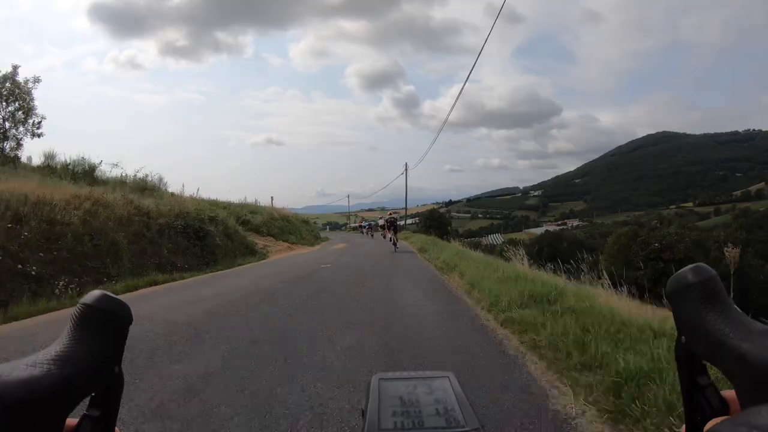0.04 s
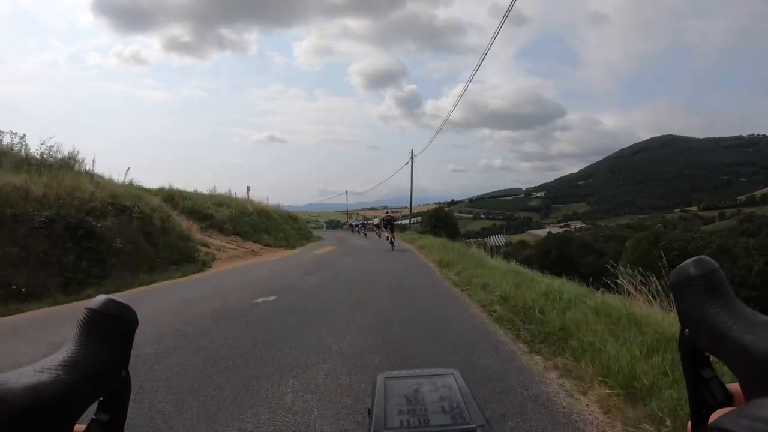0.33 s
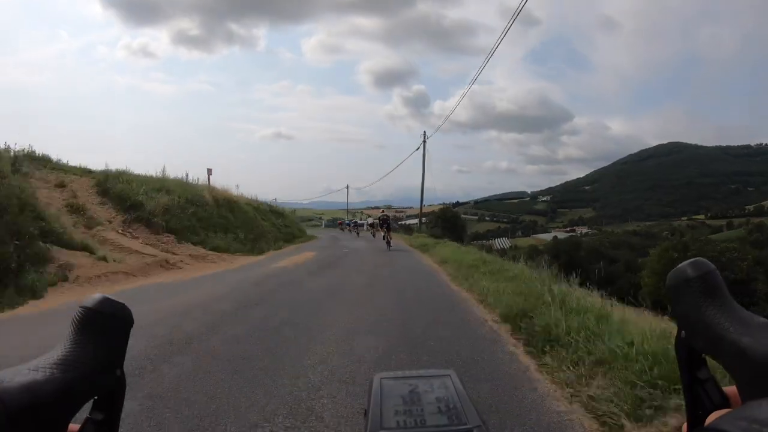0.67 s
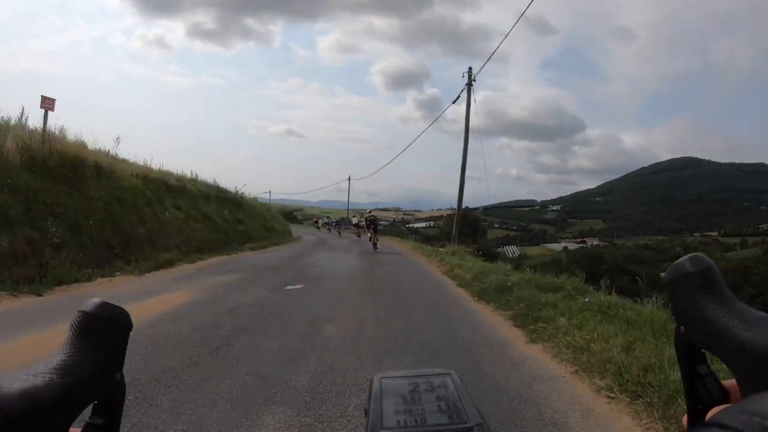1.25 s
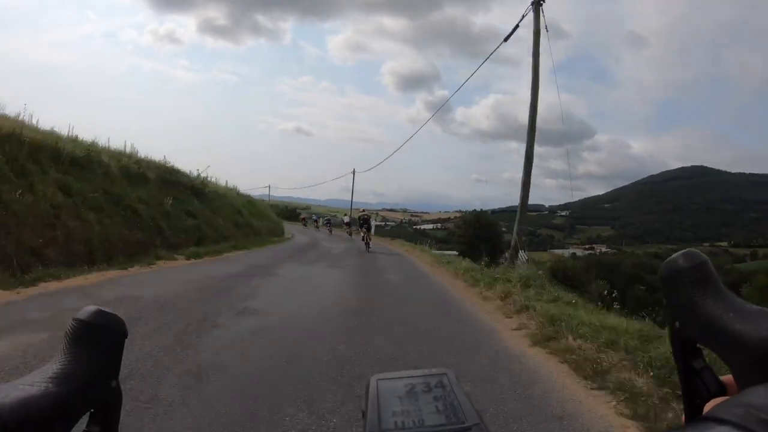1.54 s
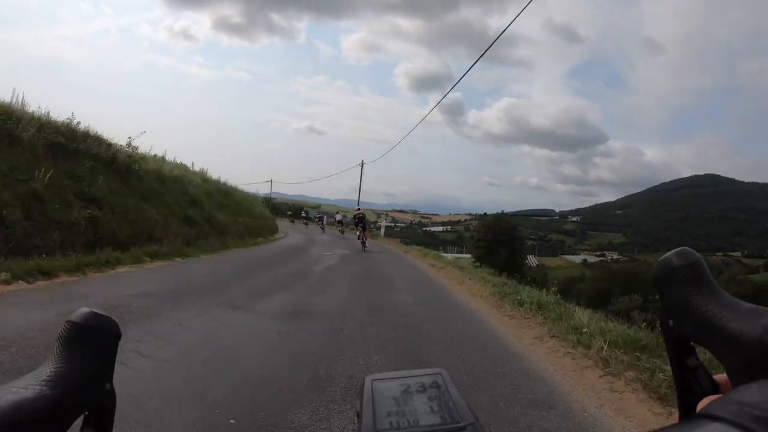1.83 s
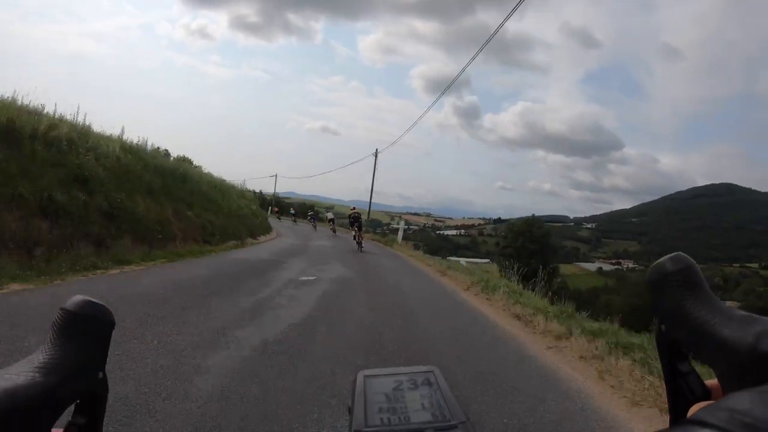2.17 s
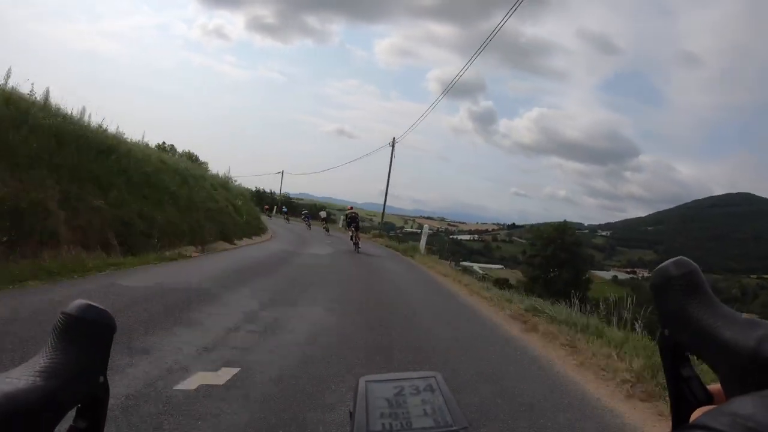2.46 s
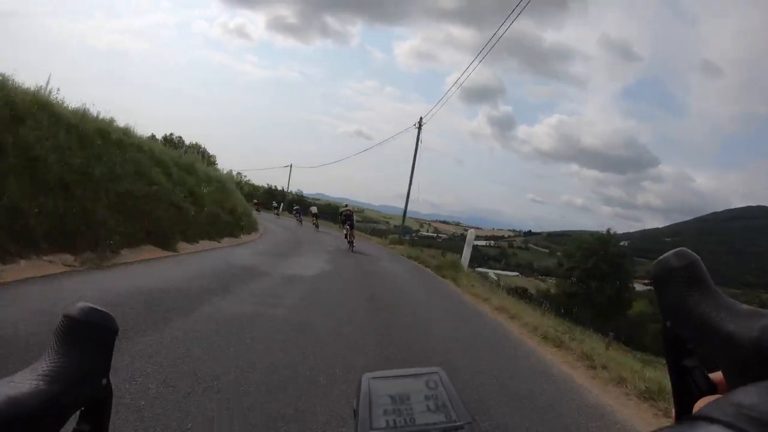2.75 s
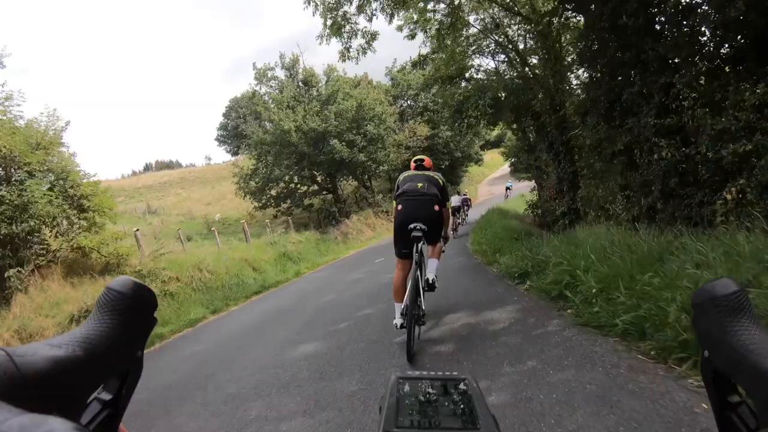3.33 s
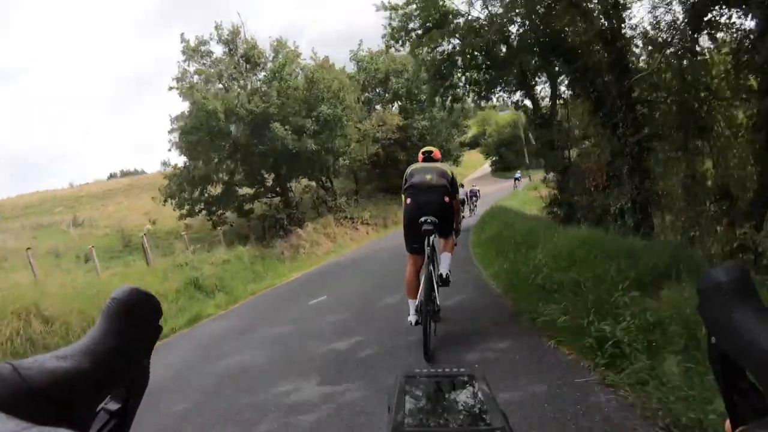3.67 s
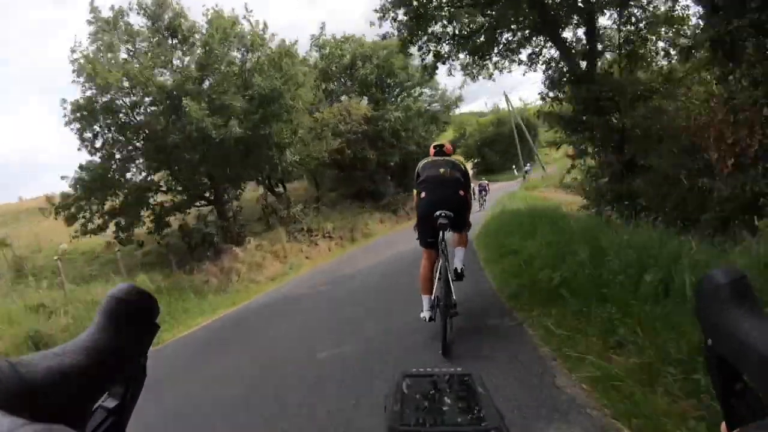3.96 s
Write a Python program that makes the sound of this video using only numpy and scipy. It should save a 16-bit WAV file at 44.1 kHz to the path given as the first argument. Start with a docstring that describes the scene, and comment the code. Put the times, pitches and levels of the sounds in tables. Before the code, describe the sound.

Wind rumbles and roars over the microphone of a speeding bicycle as something rattles.

```python
"""Wind on the microphone of a fast road bicycle fades in: heavy rumble, buffeting roar and tearing rasp
as eddies break on the port, with ragged puffs and lulls. A loose part rattles and grit ticks. Early on,
a ringing scrape, perhaps a brake, swells and dies. A thin hiss lies behind, duller after a late click.
A limiter holds the level."""
import sys
import numpy as np
from scipy import signal
from scipy.fft import rfft, irfft, next_fast_len
from scipy.io import wavfile
from scipy.ndimage import uniform_filter1d, minimum_filter1d, map_coordinates

SR = 44100
rng = np.random.default_rng(int(sys.argv[2]) if len(sys.argv) > 2 else 0)


def master_out(mix):
    """Clip the mix to full scale and print it as 16-bit PCM to the path in sys.argv[1]."""
    frames = np.transpose(np.atleast_2d(mix))
    ceiling = np.clip(frames, -1, 1)
    pcm = np.round(ceiling * 32767).astype(np.int16)
    wavfile.write(sys.argv[1], SR, pcm)


N = 176400

# Level curves: time_s, level_db
ROAR_LEVELS = [(.2, -19.5), (.34, -16), (.42, -21.5), (.65, -22.5), (.8, -20.5), (1.1, -20.5), (1.27, -24),
               (1.36, -21), (1.58, -17.5), (1.85, -21), (2.12, -21), (2.38, -21.5), (2.72, -22.5),
               (3.1, -26), (3.28, -21.5), (3.5, -24.5)]
RASP_LEVELS = [(.2, -25.5), (.35, -27.5), (.5, -29), (.73, -25), (.95, -28.5), (1.26, -31.5), (1.34, -27.5),
               (1.52, -24.5), (1.75, -28.5), (2.12, -28.5), (2.42, -31.5), (2.56, -29.5), (3.02, -34),
               (3.25, -29), (3.45, -35), (3.8, -31), (4, -37)]
SCRAPE_LEVELS = [(.15, -51), (.3, -30), (.385, -31.5), (.43, -19), (.46, -27), (.49, -25.5), (.52, -29),
                 (.56, -23.5), (.62, -41), (.67, -35), (.95, -78)]
# Noise spectra: freq_hz, gain_db
RUMBLE_SPECTRUM = [(8, -19), (22, -2), (36, -3), (62, 0), (78, -2), (95, -5.5), (120, -2), (155, -13),
                   (300, -25), (900, -85)]
ROAR_SPECTRUM = [(70, -42), (140, -3.5), (200, 0.5), (270, -3), (370, -5), (560, -8), (800, -13),
                 (1200, -21), (2200, -30), (6000, -90)]
RASP_SPECTRUM = [(200, -19), (600, 7.5), (1300, 1.5), (2050, 0), (2550, -6.5), (3000, -6), (3400, -7.5),
                 (4100, -14), (5050, -20.5), (6000, -24.5), (7200, -28.5), (10000, -38), (12500, -51.5),
                 (15500, -66)]
HISS_SPECTRUM = [(1000, 8), (4500, 10.5), (6500, 1), (7500, -0.5), (9900, -1), (11200, -9.5), (13000, -32),
                 (15000, -31)]
LATE_HISS_SPECTRUM = [(1000, -13), (4500, 10.5), (6500, 2), (8000, 3), (9000, -12), (11400, -4),
                      (12300, -15), (15000, -24)]
RATTLE_SPECTRUM = [(300, -29), (1200, -7.5), (1950, 10), (2600, -11), (3400, 0), (4200, -12.5), (5100, -10),
                   (6100, -38), (10000, -34.5), (13000, -61), (16000, -66)]
CATCH_SPECTRUM = [(1000, -26), (2500, 10), (4600, 3), (5500, -11), (6600, -18), (9800, -17), (11500, -32),
                  (15000, -42)]
PUFF_SPECTRUM = [(150, 2), (400, 7), (750, 5), (1300, 0.5), (2000, -3.5), (2700, -9), (3400, -12.5),
                 (6200, -29.5), (15000, -65)]
GRIT_SPECTRUM = [(2000, -15), (4500, 13), (6500, 5), (10000, -3), (15000, -25)]
# Knocks of a loose part on the handlebar: start_s, level_db
RATTLE_KNOCKS = [(0.1463, -9.5), (0.1681, -9), (0.224, -9), (0.2462, -7.5), (0.271, -12), (0.3245, -4),
                 (0.3466, -11), (0.6346, -13), (1.015, -9), (1.33, -13), (1.4106, -14), (1.476, -12),
                 (1.5284, -11.5), (1.5781, -16), (1.868, -14), (1.998, -20), (2.276, -24), (2.411, -18),
                 (2.546, -17.5), (2.569, -19.5), (2.872, -15), (2.92, -16.5), (3.028, -16), (3.108, -14),
                 (3.1284, -13), (3.151, -15), (3.2061, -21), (3.352, -15), (3.5392, -13), (3.7844, -15),
                 (3.818, -15), (3.8421, -17), (3.888, -14.5), (3.942, -15.5)]
# Scrape resonances: freq_hz, width_hz, gain_db
SCRAPE_RESONANCES = [(1400, 70, -1), (1670, 130, -2.5), (2000, 210, -3), (2760, 730, -12),
                     (3380, 310, -6.5), (4620, 600, -16.5), (5260, 580, -16.5)]
# Gritty catches in the scrape: centre_s, half_length_s, level_db
SCRAPE_CATCHES = [(.428, 0.014, -23.5), (.489, 0.01, -26)]
# Spurts of the scrape's whine: centre_s, half_length_s, level_db, pitch_hz
WHINE_SPURTS = [(.4, .018, -33.5, 3470), (.553, .016, -33, 3380), (.582, .016, -35, 3590),
                (0.667, 0.033, -38.5, 3400)]
# Deep buffets and ragged puffs of air: centre_s, half_length_s, level_db
AIR_BUFFETS = [(.215, 0.015, -15.5), (1.195, 0.019, -18.5), (3.292, 0.012, -21)]
AIR_PUFFS = [(.727, 0.007, -20), (1.94, 0.0071, -18), (2.005, 0.0044, -22), (2.08, 0.017, -22.5),
             (2.71, 0.025, -23), (3.235, 0.0043, -20.5), (3.37, 0.0064, -19.5), (3.465, 0.0065, -19),
             (3.537, 0.0066, -17.5), (3.605, 0.0086, -24), (3.631, 0.015, -19), (3.722, 0.0052, -18.5),
             (3.98, 0.014, -20)]
# Clear ticks of grit: start_s, level_db
GRIT_TICKS = [(0.8111, -36), (1.3688, -34), (1.7739, -38), (2.835, -31.5), (3.1328, -36)]
# Lulls between gusts: centre_s, half_length_s, depth_db
WIND_LULLS = [(1.254, 0.01, 7), (2.377, 0.015, 6), (3.085, 0.036, 2), (3.806, 0.0074, 6)]

CLICK_S = 3.3272


def amp(db):
    """Decibels to gain."""
    return 10 ** (np.asarray(db) / 20)


def unit(x):
    """Scale to rms 1."""
    return x / np.sqrt(np.mean(x ** 2) + 1e-20)


def clock():
    """Seconds at each sample."""
    return np.arange(N) / SR


def level(rows):
    """Gain per sample from (time_s, level_db) points."""
    return amp(np.interp(clock(), *np.transpose(rows)))


def wobble(rate_hz):
    """Smooth random curve through knots at rate_hz."""
    knots = rng.standard_normal(8192)
    return map_coordinates(knots, [clock() * rate_hz + 2], mode="wrap")


def filtered(x, response):
    """Apply the frequency response response(hz)."""
    size = next_fast_len(N + SR // 2)
    return irfft(rfft(x, size) * response(np.fft.rfftfreq(size, 1 / SR)), size)[:N]


def coloured(x, spectrum):
    """Shape x by (freq_hz, gain_db) points; rms 1."""
    freq_hz, gain_db = np.transpose(spectrum)
    return unit(filtered(x, lambda hz: amp(np.interp(np.log(hz + 1), np.log(freq_hz), gain_db))))


def noise(spectrum):
    """Coloured noise, rms 1."""
    return coloured(rng.standard_normal(N), spectrum)


def bell(x, centre, half_width):
    """Gaussian, peak 1."""
    return np.exp(-.5 * ((x - centre) / half_width) ** 2)


def swells(rows):
    """Bell envelopes from (centre_s, half_length_s, level_db) rows."""
    return sum(amp(db) * bell(clock(), centre_s, half_s) for centre_s, half_s, db in rows)


def knocks(rows, rise_s, decay_s):
    """Impact envelopes from (start_s, level_db) rows."""
    envelope = np.zeros(N + SR)
    t = np.arange(SR // 20) / SR
    shape = (1 - np.exp(-t / rise_s)) * np.exp(-t / decay_s)
    for start_s, db in rows:
        envelope[max(round(start_s * SR), 0):][:len(t)] += amp(db) * shape
    return envelope[:N]


def limited(x, ceiling, hold_s):
    """Lower the gain smoothly around peaks above the ceiling."""
    size = max(int(hold_s * SR), 8)
    needed_gain = np.minimum(1, ceiling / (np.abs(x) + 1e-9))
    return x * uniform_filter1d(minimum_filter1d(needed_gain, size), size)


def eddies(slow_db, mid_db, fast_db):
    """Level swing in dB from eddies passing the port; large and middling ones saturate."""
    return slow_db * np.tanh(wobble(29.88)) + mid_db * np.tanh(wobble(125)) + fast_db * wobble(560)


def wind(rumble_db=-14.5, surge_db=1.5, roar_gain_db=1.5, crackle_gain_db=-11.5):
    """Surging rumble, roar and crackling rasp; the same eddies drive roar and rasp."""
    eddy_db = eddies(slow_db=1.65, mid_db=2.5, fast_db=1.52)
    held = limited(noise(RUMBLE_SPECTRUM), ceiling=1.4, hold_s=0.04)
    rumble = amp(rumble_db) * unit(held * amp(surge_db * np.tanh(wobble(24.09))))
    roar = coloured(rng.standard_normal(N) * amp(eddy_db + 0.6 * wobble(60)), ROAR_SPECTRUM)
    tearing_db = eddy_db + eddies(slow_db=1, mid_db=0.64, fast_db=-1.15)
    rasp = coloured(rng.standard_normal(N) * amp(tearing_db), RASP_SPECTRUM)
    rasp += amp(crackle_gain_db) * crackle()
    gusts = amp(roar_gain_db) * level(ROAR_LEVELS) * roar + level(RASP_LEVELS) * rasp
    return rumble + lulls() * gusts


def crackle(snaps_per_s=90, spread_db=4, decay_s=0.00077, top_hz=5500):
    """Tiny random snaps of uneven size, brighter than the rasp; rms 1."""
    snaps = rng.random(N) < snaps_per_s / SR
    strength = amp(spread_db * np.clip(rng.standard_normal(N), -2, 2))
    envelope = signal.lfilter([1], [1, -np.exp(-1 / (decay_s * SR))], snaps * strength)
    bright = filtered(envelope * rng.standard_normal(N), lambda hz: hz / (1 + (hz / top_hz) ** 10))
    return coloured(bright, RASP_SPECTRUM)


def hiss(early_db=-51.5, drift_db=0.88, late_db=-55):
    """Thin hiss of air and tyres, duller after the click."""
    early = amp(early_db + drift_db * wobble(4.2)) * noise(HISS_SPECTRUM)
    late = amp(late_db) * noise(LATE_HISS_SPECTRUM)
    return np.where(clock() < CLICK_S, early, late)


def rattle(gain_db=-1, mean_flight_s=0.0156, mean_loss_db=4.5):
    """The road shakes a loose part: dry knocks, each with a softer bounce."""
    scatter = rng.uniform(.5, 1.5, (len(RATTLE_KNOCKS), 2))
    bounces = [(start_s + mean_flight_s * flight, db - mean_loss_db * loss)
               for (start_s, db), (flight, loss) in zip(RATTLE_KNOCKS, scatter)]
    ring = unit(limited(noise(RATTLE_SPECTRUM), ceiling=0.96, hold_s=0.001))
    return amp(gain_db) * knocks([*RATTLE_KNOCKS, *bounces], rise_s=0.00056, decay_s=0.0018) * ring


def scrape(top_hz=5800, friction_rough_db=1.65, catch_rough_db=1.7):
    """Friction noise rings a few broad resonances and catches twice."""
    def body(hz):
        modes = sum((-1) ** k * amp(db) / (1 + 1j * (hz ** 2 - mode_hz ** 2) / ((hz + 1) * width_hz))
                    for k, (mode_hz, width_hz, db) in enumerate(SCRAPE_RESONANCES))
        return modes / (1 + (hz / top_hz) ** 12)

    friction = rng.standard_normal(N) * amp(friction_rough_db * wobble(300))
    ring = unit(filtered(friction, body))
    gritty = unit(noise(CATCH_SPECTRUM) * amp(catch_rough_db * wobble(250)))
    return level(SCRAPE_LEVELS) * ring + swells(SCRAPE_CATCHES) * gritty


def puffs(rough_db=3.5, buffet_hz=258, buffet_half_width_hz=91):
    """Single large eddies strike the port as ragged puffs and deep buffets."""
    ragged = unit(noise(PUFF_SPECTRUM) * amp(rough_db * np.tanh(wobble(400))))
    low_band = filtered(rng.standard_normal(N), lambda hz: bell(hz, buffet_hz, buffet_half_width_hz))
    deep = unit(limited(unit(low_band), ceiling=1, hold_s=0.026))
    return swells(AIR_PUFFS) * ragged + swells(AIR_BUFFETS) * deep


def whine(waver_hz=20, roughness=.45):
    """A narrow scrape resonance sings in rough, wavering spurts, each at its own pitch."""
    offset_hz = waver_hz * wobble(69.6)
    tone = np.zeros(N)
    for centre_s, half_s, db, pitch_hz in WHINE_SPURTS:
        phase = 2 * np.pi * np.cumsum(pitch_hz + offset_hz) / SR
        tone += swells([(centre_s, half_s, db)]) * np.sin(phase)
    return np.sqrt(2) * tone * unit(1 + roughness * wobble(240))


def grit(gain_db=5.5, faint_count=70):
    """A few clear ticks among many faint ones, likely grit thrown up by the tyres."""
    faint_s = rng.uniform(0, N / SR, faint_count)
    faint_db = rng.normal(-54, 5, faint_count)
    envelope = knocks([*GRIT_TICKS, *zip(faint_s, faint_db)], rise_s=.0001, decay_s=0.00088)
    return amp(gain_db) * envelope * noise(GRIT_SPECTRUM)


def lulls():
    """Gain that dips between gusts."""
    dip_db = sum(depth_db * bell(clock(), centre_s, half_s) for centre_s, half_s, depth_db in WIND_LULLS)
    return amp(-dip_db)


def click(level_db=-20):
    """One thin click as the hiss dulls."""
    return amp(level_db) * signal.unit_impulse(N, round(CLICK_S * SR))


def scene():
    """All sources at one microphone."""
    return (wind() + puffs() + rattle() + grit() + scrape() + whine() + hiss() + click())[None]


def record(dry):
    """Limiter, fade-in, band limit."""
    fade_start_s, fade_s, top_hz = 0.11, 0.066, 15200
    held = limited(dry[0], ceiling=0.59, hold_s=0.0053)
    fade = np.clip((clock() - fade_start_s) / fade_s, 0, 1) ** 2.26
    return filtered(held * fade, lambda hz: hz < top_hz)[None]


dry = scene()
out = record(dry)
master_out(out)
```